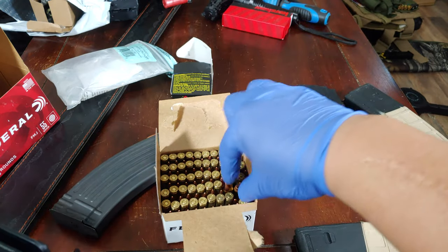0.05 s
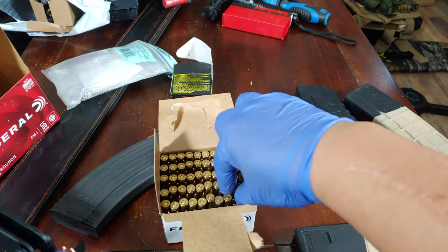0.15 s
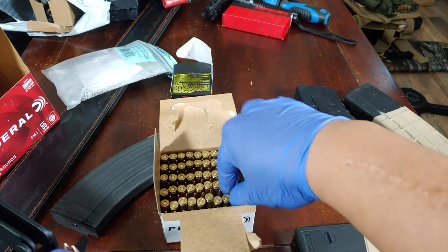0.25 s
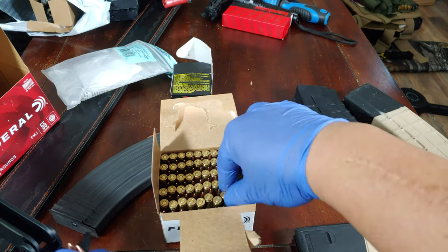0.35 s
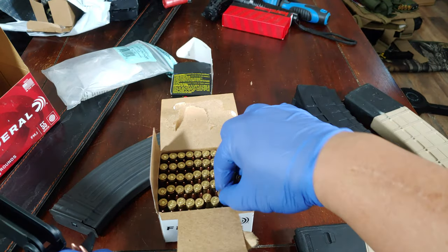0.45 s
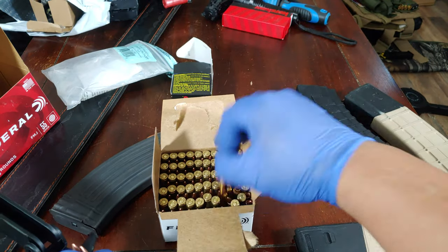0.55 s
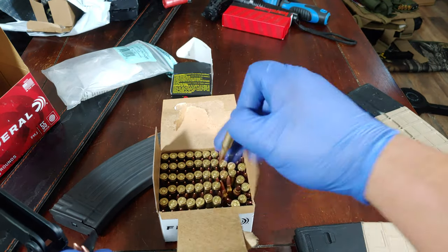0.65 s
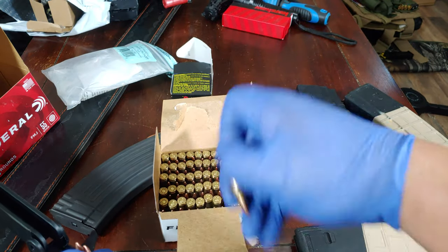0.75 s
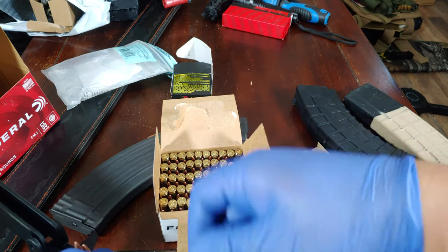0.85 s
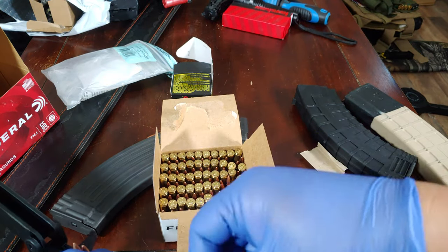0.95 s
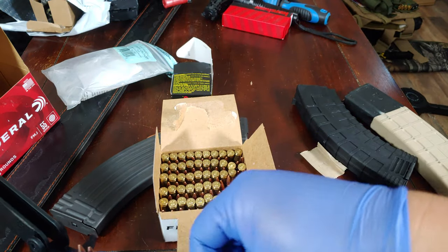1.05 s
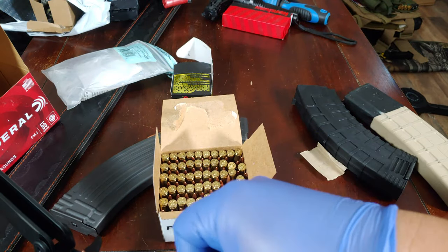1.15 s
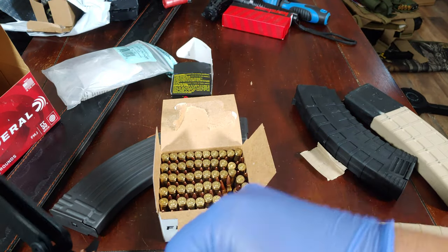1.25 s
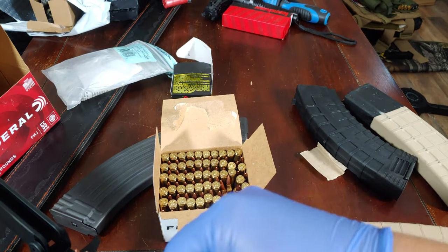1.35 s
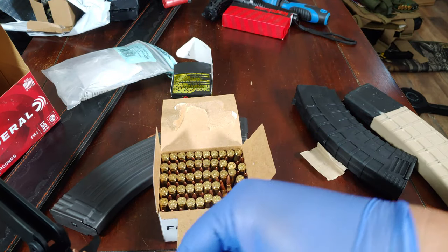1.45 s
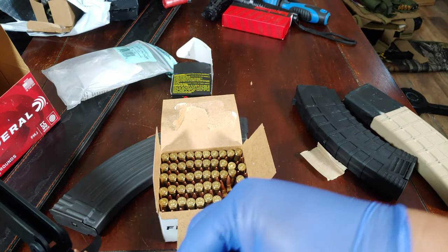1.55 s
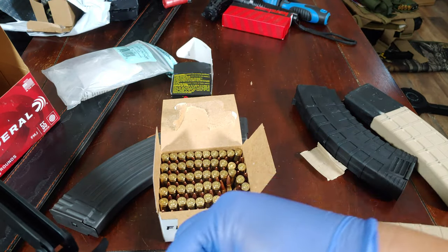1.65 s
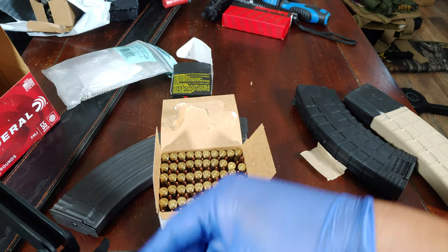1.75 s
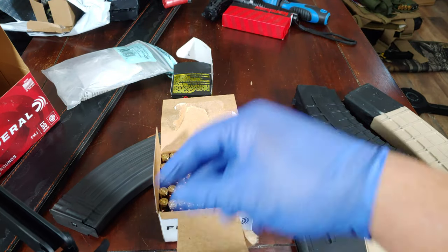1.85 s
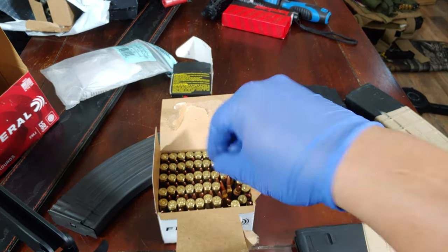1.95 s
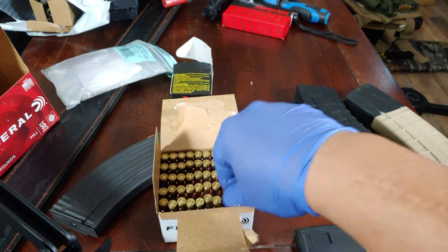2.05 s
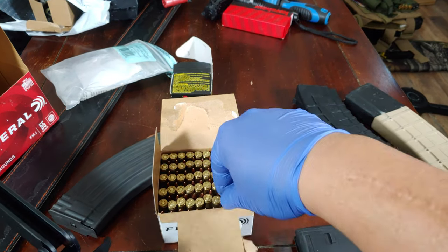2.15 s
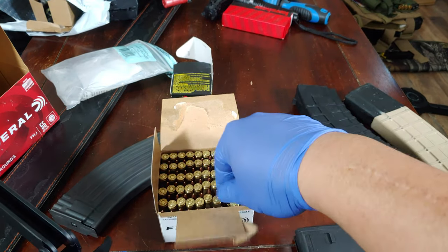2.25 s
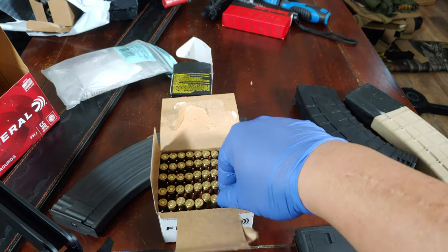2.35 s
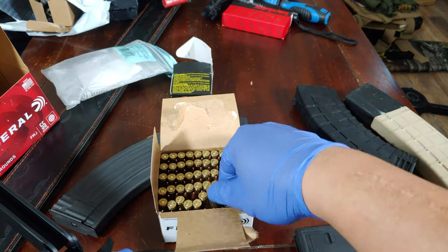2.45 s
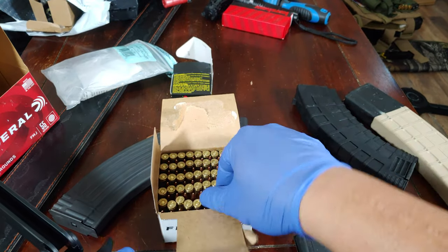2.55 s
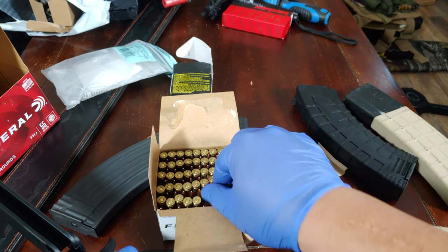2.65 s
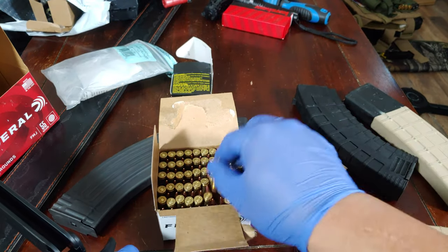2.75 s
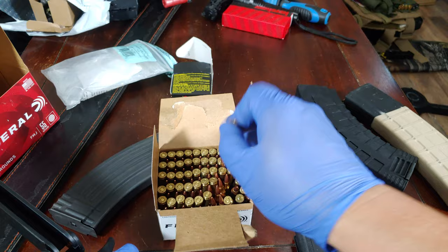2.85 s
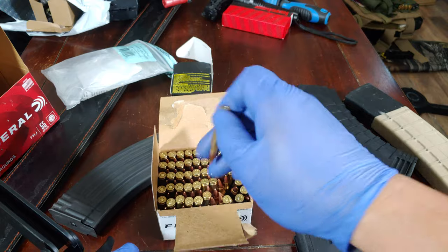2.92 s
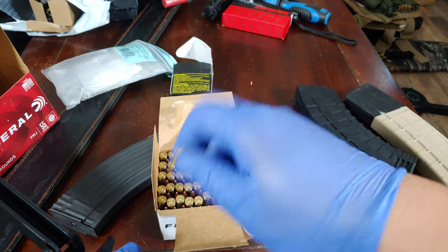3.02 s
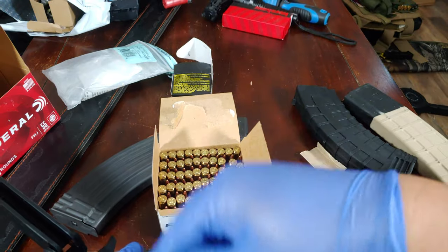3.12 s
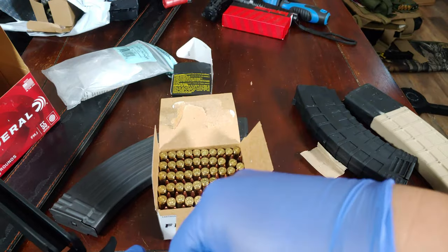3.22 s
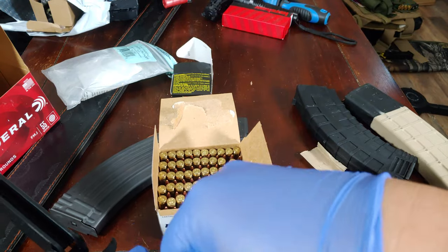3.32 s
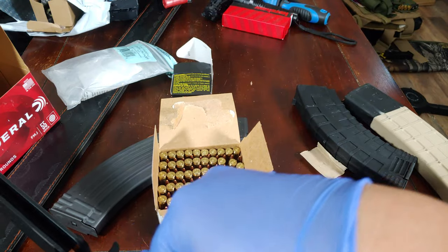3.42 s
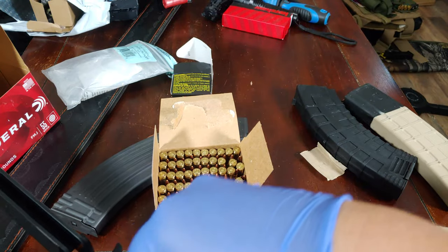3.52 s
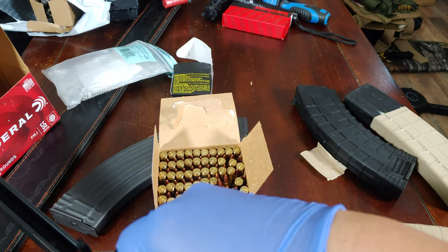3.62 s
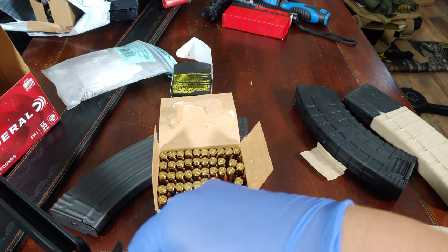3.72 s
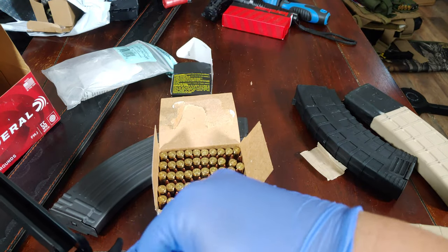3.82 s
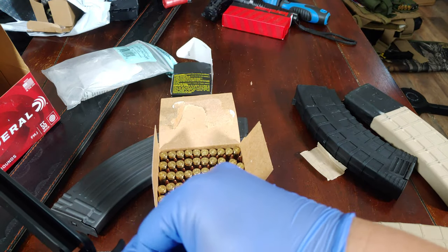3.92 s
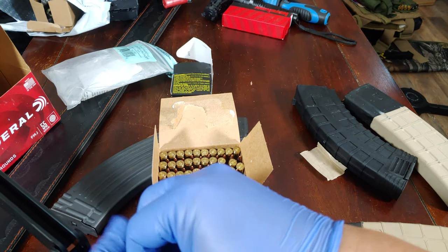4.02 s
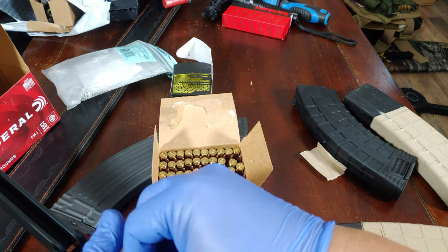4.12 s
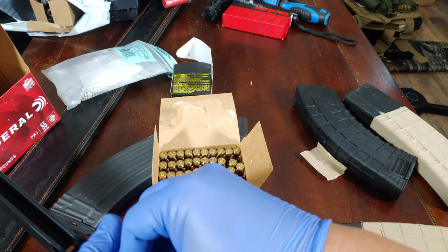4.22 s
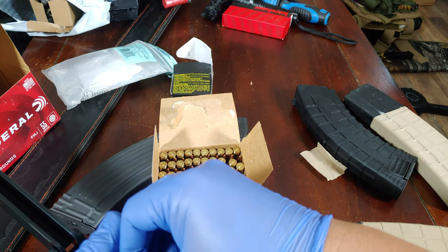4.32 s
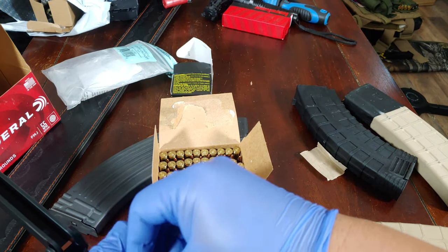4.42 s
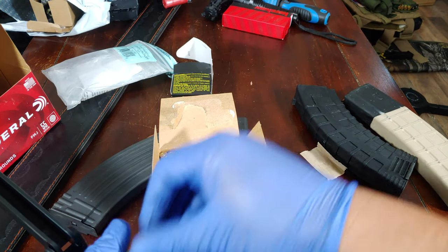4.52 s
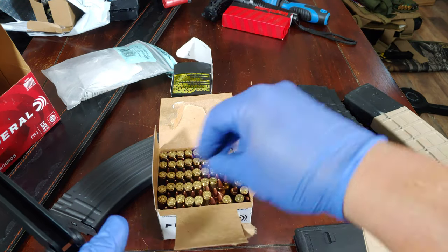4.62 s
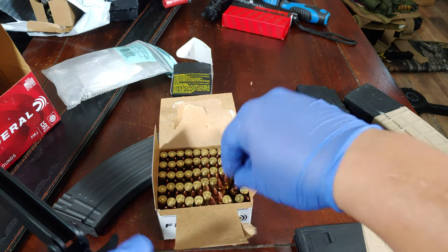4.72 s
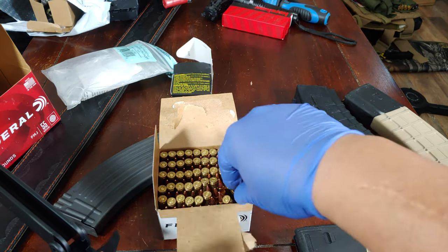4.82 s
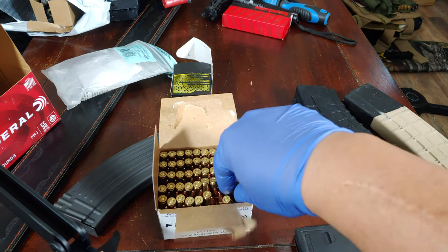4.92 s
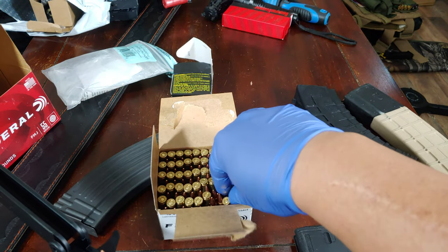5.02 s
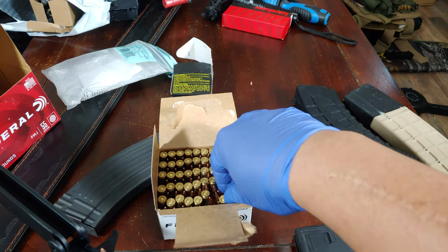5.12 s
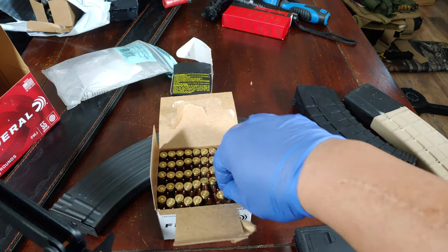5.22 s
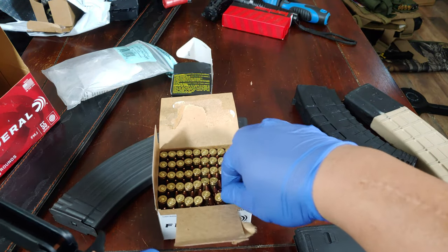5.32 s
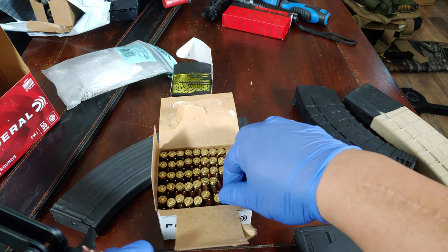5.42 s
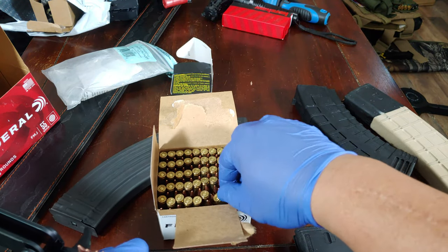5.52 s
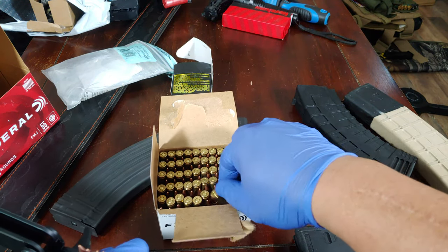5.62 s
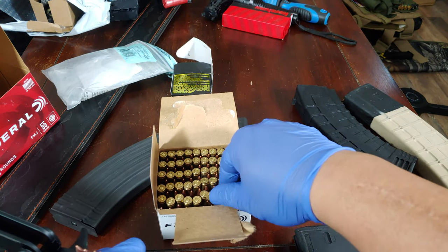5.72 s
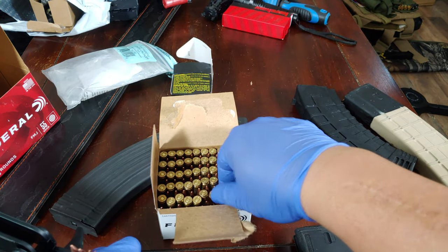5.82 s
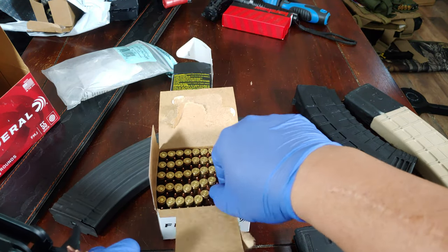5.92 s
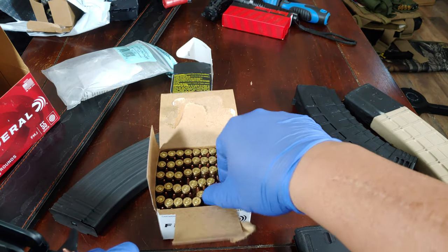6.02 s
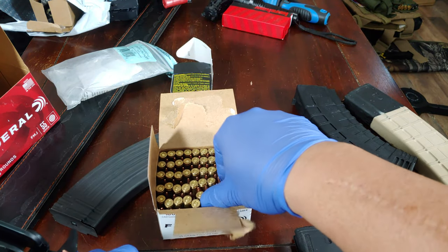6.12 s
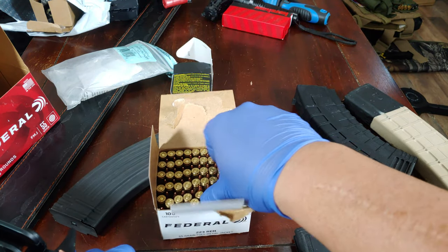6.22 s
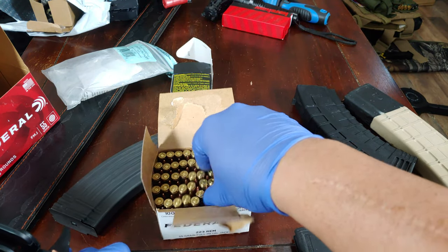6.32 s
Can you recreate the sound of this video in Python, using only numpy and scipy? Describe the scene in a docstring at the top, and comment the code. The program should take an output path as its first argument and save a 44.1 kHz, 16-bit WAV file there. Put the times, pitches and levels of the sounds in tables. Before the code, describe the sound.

Close, dry scraping and clinking of cartridges taken from a carton, then hard plastic snaps of a magazine, over a faint low room hum.

```python
"""Over a low hum of air, a gloved hand scrapes about in a cardboard box of brass cartridges.
Knocks on the box, clicks of a plastic magazine and clinks of brass follow; soft table bumps join in.
From about 1.4 s cases also slide along the feed lips; hits are loudest from 3 to 4.5 s, then busy again after 5 s.
Contacts are noisy pushes that ring modes, scrapes are clumped slips through resonances, hum is shaped noise.
Table echoes and a furnished room answer; two spaced microphone ports listen from close by."""
import sys
import numpy as np
from scipy import signal
from scipy.fft import rfft, irfft, next_fast_len
from scipy.io import wavfile
from scipy.ndimage import map_coordinates

SR = 44100
rng = np.random.default_rng(int(sys.argv[2]) if len(sys.argv) > 2 else 0)


def to_wav(s):
    """Save 16-bit WAV."""
    ch = np.atleast_2d(s).T  # columns
    pcm = np.round(np.clip(ch, -1, 1) * 32767)  # PCM
    wavfile.write(sys.argv[1], SR, pcm.astype(np.int16))


def invert_db(x):
    """Field ratio 10**(x/20) for x, a level in decibels (scalar or array-like)."""
    u = np.asarray(x, float) / 20
    return 10 ** u


N = 280917  # samples


def unit(x):
    """Scales a sound to rms 1."""
    return x / np.sqrt(np.mean(x ** 2) + 1e-20)


def along(points, hz):
    """Reads a curve of (Hz, value) points on a log frequency axis."""
    f, v = np.transpose(points)
    return np.interp(np.log(hz + 1), np.log(f + 1), v)


def filtered(x, response):
    """Multiplies the spectrum of x by a complex response of frequency."""
    m = next_fast_len(x.shape[-1] + 8192)
    spectrum = rfft(x, m) * response(np.fft.rfftfreq(m, 1 / SR))
    return irfft(spectrum, m)[..., :x.shape[-1]]


def pair(alike):
    """Two white noises whose likeness follows (Hz, 0-1) points, by mixing a mid and a side noise."""
    def weights(hz):
        turn = np.arccos(np.clip(along(alike, hz), 0, 1)) / 2
        return np.array([np.cos(turn), np.sin(turn)])
    mid, side = filtered(rng.standard_normal((2, N)), weights)
    return np.array([mid + side, mid - side])


def wander(step):
    """Smooth random curve with a new value every so many samples."""
    return map_coordinates(rng.standard_normal(N // step + 4), [np.arange(N) / step])


# Colour of the room tone. Each row: frequency in Hz, relative level in dB per Hz.
AIR_COLOUR = [(12, -49), (20, -26), (34, -8), (54, 1), (69, -10), (81, -10.5), (129, -7), (286, -19.5),
              (337, -16), (386, -15.5), (725, -27.5), (1250, -73.5), (14000, -46.5)]
# Likeness of the hum at the two ports. Each row: frequency in Hz, likeness from 0 to 1.
AIR_LIKENESS = [(60, 0.97), (240, 0.78), (950, 0.29), (3770, 0.21), (15000, 0.21)]
# Swells of the deepest bass. Each row: time in seconds, rms level in dB ahead of the microphone.
RUMBLE_LEVEL = [(0.0, -52.5), (0.3, -62.5), (0.92, -55.5), (1.06, -68), (1.38, -50.5), (2.07, -61),
                (2.29, -48.5), (2.38, -78), (2.48, -47), (2.62, -58.5), (3.03, -45), (3.37, -59.5),
                (4.7, -66), (5.06, -51), (5.23, -66), (5.46, -48.5), (5.91, -59), (6.01, -43), (6.17, -55),
                (6.37, -51)]


def air():
    """Shaped noise whose level wavers slowly; its deepest bass swells and sinks."""
    colour = lambda hz: invert_db(along(AIR_COLOUR, hz))
    low = filtered(pair(AIR_LIKENESS), lambda hz: colour(hz) / (1 + (hz / 150) ** 4))
    rumble = invert_db(np.interp(np.arange(N) / SR, *np.transpose(RUMBLE_LEVEL))) * unit(low)
    hum_db = -55.5 + 4.3 * wander(6000)
    return rumble + invert_db(hum_db) * unit(filtered(pair(AIR_LIKENESS), colour))


def rubbed(modes, level_db, rate, spread_db, widen, mono_hz):
    """Random small slips, coming in clumps, feed the resonances of a body."""
    slip_db = spread_db * np.minimum(rng.exponential(size=N), 3.5)
    slips = (rng.random(N) < rate / SR) * invert_db(slip_db)  # rate: slips per second
    decay = invert_db(-60 * np.arange(400) / SR / 0.0076)
    burst = signal.fftconvolve(slips, decay)[:N] * invert_db(2.09 * wander(800))
    drive = burst * pair([(mono_hz / 4, 1), (mono_hz, .6), (mono_hz * 4, .2)])

    def body(f):
        total = 0
        for k, (centre, db, t60) in enumerate(modes):
            damping = 1j * f * widen * np.log(1000) / np.pi / t60
            total = total + (-1) ** k * invert_db(db) * damping / (centre ** 2 - f * f + damping)
        return total
    return invert_db(level_db) * unit(filtered(drive, body))


def stirred(level_db, events, under_db, t60):
    """The fingers' level in dB, raised by a rattle that dies away after each contact."""
    kicks = np.zeros(N)
    for s, db, *_ in events:
        kicks[round(s * SR)] += invert_db(db - under_db) ** 2
    rattle = signal.lfilter([1], [1, -invert_db(-2 * 60 / t60 / SR)], kicks)  # a power
    return 10 * np.log10(invert_db(level_db) ** 2 + rattle)


# Fingers at work. Each row: time in seconds, then drive levels in dB, before the rattle of contacts is added,
# of the box scrape, the magazine rub and the brass jostle.
FINGERS = [(0.0, -60.5, -71, -69), (0.25, -53, -65.5, -75), (0.7, -49.5, -60, -70), (0.95, -58, -71.5, -65),
           (1.33, -56.5, -69, -69.5), (1.5, -54.5, -72.5, -69), (1.8, -55, -55, -65), (2.03, -63, -77, -86),
           (2.4, -56, -67.5, -76), (2.52, -44, -53.5, -49), (2.66, -50.5, -64, -58), (2.9, -38, -52.5, -62),
           (3.14, -52.5, -64.5, -59), (3.28, -64.5, -76, -67), (3.6, -53, -53.5, -85),
           (3.9, -55.5, -57, -69), (4.18, -58.5, -46, -43), (4.38, -60, -58, -73), (4.72, -71, -68.5, -85),
           (4.93, -63, -77.5, -75.5), (5.05, -54, -65, -70), (5.3, -48, -63, -63), (5.6, -53, -66.5, -74),
           (5.77, -54.5, -69.5, -76), (5.9, -43.5, -50.5, -58), (6.12, -39, -46, -61),
           (6.23, -51.5, -56.5, -71), (6.37, -43.5, -48, -59)]


def handling():
    """Fingers drag on the cardboard, rub the magazine and jostle the loose cases, all as clumped slips."""
    s, *levels = np.transpose(FINGERS)
    box_db, shell_db, brass_db = [np.interp(np.arange(N) / SR, s, db) for db in levels]
    # rattle: dB under the contact's listed strength, then t60 in seconds
    box_db = stirred(box_db, BOX_KNOCKS, 30, 0.25)
    shell_db = stirred(shell_db, SHELL_CLICKS, 33, 0.3)
    brass_db = stirred(brass_db, BRASS_CLINKS, 33.7, 0.3)
    scrape = rubbed(BOX_MODES, box_db, rate=500, spread_db=0.0, widen=1.0, mono_hz=1470)
    rub = rubbed(SHELL_MODES, shell_db, rate=560, spread_db=4.5, widen=1.1, mono_hz=900)
    jostle = rubbed(BRASS_MODES, brass_db, rate=400, spread_db=2.5, widen=3.8, mono_hz=1100)
    return scrape + rub + jostle


def ring(modes, centre_hz, blur_hz, slope_db, scatter_db, detune, mono_hz):
    """A body's modal answer to one tap at each port, and its answer averaged over all directions."""
    hz, db, t60 = np.transpose(modes)[:, :, None]
    t = np.arange(round(min(t60.max(), .2) * SR)) / SR
    pitch, common, differ, phase = rng.standard_normal((4, len(modes), 1))
    aim_db = -slope_db * np.abs(np.log2(hz / centre_hz))  # the spot struck favours the modes near one pitch
    apart = hz / (hz + mono_hz)  # short waves differ more from port to port
    swing = np.exp((2j * np.pi * hz * (1 + detune * pitch) - np.log(1000) / t60) * t)
    ports = []
    for side in (1, -1):
        strength = invert_db(db + aim_db + scatter_db * (common + side * apart * differ))
        ports.append(strength * np.exp(1.7j * side * apart * phase))
    tap = (np.array(ports)[:, :, 0] @ swing).imag

    # over all directions the powers of the modes add and smear
    f = np.fft.rfftfreq(8192, 1 / SR)
    width = np.log(1000) / (2 * np.pi * t60)
    wide = width + blur_hz
    peaks = invert_db(db + aim_db) ** 2 * wide / width / ((f - hz) ** 2 + wide ** 2)
    power = np.sum(peaks, axis=0) * f ** 2 / (f ** 2 + hz.min() ** 2)
    # folding the cepstrum gives this spectrum its earliest, minimum-phase answer
    cepstrum = irfft(np.log(power + 1e-12))[:4096]
    cepstrum[0] /= 2
    spread = irfft(np.exp(rfft(cepstrum, 8192)))[:4096]
    return tap, spread


# The crack at the moment of contact, for every kind of hit. Each row: frequency in Hz, relative level in dB per Hz.
CRACK_COLOUR = [(180, -46.5), (300, -21), (4170, 0), (5640, -7.5), (8020, 6), (9490, -9), (10300, -3.5),
                (13300, -27), (16500, -26.5)]


def blows(events, modes, gain_db, crack_db, sharp, blur_hz, **body):
    """Each contact is a rough push that swells and fades, ringing the body and cracking: left, right, all round."""
    rings, cracks = np.zeros((2, 3, N + SR))
    for s, db, centre_hz, pan_db, rise_ms in events:
        t = np.arange(round(rise_ms * SR / 100) + 8) / SR  # ten rise times
        u = t / (rise_ms / 1000)
        push = u * np.exp(1 - u) * rng.standard_normal((3, len(t)))
        grit = np.repeat(rng.standard_normal(len(t) // 64 + 1), 64)[:len(t)]
        push = push * invert_db(4.5 * grit)  # it catches and slips
        push[:, np.argmax(u >= 1)] += sharp  # the moment of hardest contact
        tap, spread = ring(modes, centre_hz, blur_hz, **body)

        sound = signal.fftconvolve(tap[:2], push[:1], axes=1)
        sound = sound / np.sqrt(np.mean(np.max(sound ** 2, axis=1)))
        level = invert_db(db + np.array([[pan_db / 2], [-pan_db / 2]]))
        at = round(s * SR)
        rings[:2, at:at + sound.shape[1]] += level * sound

        # a short push is one tap to the room
        around = signal.fftconvolve(spread, push[2]) if rise_ms > 4 else spread
        match = np.linalg.norm(sound) / np.linalg.norm(around) / np.sqrt(2)
        rings[2, at:at + len(around)] += invert_db(db) * around * match
        crack = 0.17 * push[:1] + 0.39 * push  # partly shared by the three rows
        cracks[:, at:at + len(t)] += np.append(level, invert_db(db))[:, None] * crack
    snap = filtered(cracks, lambda hz: invert_db(along(CRACK_COLOUR, hz)))
    return (invert_db(gain_db) * rings + invert_db(crack_db) * snap)[:, :N]


def radiated(x, low_hz):
    """Small things radiate little bass: a second-order roll-off below low_hz."""
    return filtered(x, lambda hz: (1j * hz / (low_hz + 1j * hz)) ** 2)


# Knocks that ring the cardboard box; the rows at 4.0223 s and 4.1355 s are the two hard snaps, here given a low
# cardboard ring. # Each row: start in seconds, relative strength in dB, favoured pitch in Hz, rise in ms.
BOX_KNOCKS = [(0.023, -34.5, 1020, 6.9), (0.1452, -29.5, 740, 1.85), (0.295, -33.5, 1000, 5.5),
              (0.409, -28.5, 980, 5.8), (0.44, -29, 1060, 3.6), (0.535, -34.5, 1000, 3),
              (0.642, -26, 960, 4.4), (0.8058, -23.5, 770, 1.63), (0.83, -37.5, 900, 3),
              (1.0854, -29.5, 1060, 1.2), (1.2004, -31.5, 537, 2.1), (1.4686, -30, 825, 1.42),
              (1.7673, -31, 750, 1.5), (1.8698, -22.5, 1100, 0.45), (2.462, -28.5, 900, 4),
              (2.5396, -32, 1050, 5), (2.674, -23, 1000, 2), (2.9329, -19.5, 704, 3.46),
              (2.9593, -22, 415, 1.7), (3.0242, -8, 660, 0.86), (3.0295, -15.5, 600, 0.49),
              (3.05, -24, 490, 2.8), (3.3496, -19.5, 960, 2.7), (3.5857, -24.5, 840, 1.15),
              (3.602, -25, 1030, 3.5), (3.6654, -26, 1190, 2.14), (3.9882, -22, 1180, 1.5),
              (4.0223, -24.5, 770, 0.71), (4.1355, -23, 830, 0.71), (4.1689, -29, 367, 10.84),
              (4.2379, -26, 1100, 8.5), (5.0207, -30.5, 840, 2.2), (5.061, -34.5, 690, 2.8),
              (5.3375, -34, 1040, 10), (5.365, -30.5, 806, 3.6), (5.4586, -34.5, 945, 6.2),
              (5.4743, -20.5, 1120, 2.6), (5.6502, -22.5, 1150, 0.63), (5.696, -34, 1190, 3),
              (5.8283, -21.5, 1000, 2), (5.8872, -28.5, 704, 5.1), (5.9022, -24, 970, 3.7),
              (5.9844, -18, 1080, 1.2), (6.0199, -24, 1030, 5.6), (6.0726, -23, 960, 5.9),
              (6.1159, -30.5, 1000, 7.5), (6.1498, -21, 1080, 3.3), (6.287, -24.5, 1000, 0.9),
              (6.295, -23, 1000, 2.44), (6.3217, -25.5, 854, 4.1)]
# Resonances of the box. Each row: frequency in Hz, relative level in dB, t60 in seconds.
BOX_MODES = [(234, -1, 0.04), (339, -1.5, 0.021), (503, -2, 0.021), (600, -3, 0.025), (750, -2, 0.035),
             (957, 3, 0.023), (1135, -1.5, 0.031), (1239, 1.5, 0.02), (1585, -2, 0.016), (1950, -6, 0.013),
             (2410, -20.5, 0.0064)]


def knocks():
    """Cases knock the box and ring its short, low cardboard modes."""
    pan_db = -0.5  # left over right
    events = [(s, db, hz, pan_db, rise_ms) for s, db, hz, rise_ms in BOX_KNOCKS]
    card = dict(slope_db=5, scatter_db=2, detune=.06, mono_hz=3000)
    return radiated(blows(events, BOX_MODES, 0.36, -53.5, 4.4, 30, **card), 170)


# Contacts with the magazine shell.
# Each row: start in seconds, relative strength in dB, favoured pitch in Hz, left over right in dB, rise in ms.
SHELL_CLICKS = [(0.1546, -35.5, 2800, -3, 0.6), (0.1934, -29.5, 2510, -1, 0.34),
                (0.695, -38, 2180, -6, 0.23), (1.0644, -32, 1950, 0, .98), (1.0855, -10, 3750, 9, 0.44),
                (1.2499, -32.5, 2360, 4, 0.79), (1.3273, -44, 2320, 7, 1), (1.4278, -26, 3300, 4, 0.49),
                (1.484, -35, 3540, -3, 0.34), (1.6029, -37.5, 2590, 11, 1.8), (1.7305, -35.5, 2760, 3, 5.2),
                (1.8414, -33.5, 3000, 14, .44), (1.811, -30.5, 3600, 0, 1), (1.8695, -17.5, 3300, 17, 0.4),
                (1.8709, -20, 2580, -16, 2.7), (1.949, -22, 3280, 0, 0.32), (2.2204, -44, 1960, -1, 2.3),
                (2.575, -28.5, 2550, 6, 0.68), (2.9325, -28.5, 3020, 6, 1.15),
                (3.3489, -21.5, 2580, 1, 0.65), (3.392, -12.5, 2287, 3, 0.828),
                (3.583, -27.5, 2200, 6, 0.32), (3.6679, -20.5, 2530, 5, 2.3), (3.6961, -8, 2734, 3, 1.67),
                (3.7183, -17, 3200, 6.5, 2.72), (3.9177, -30, 2240, -2, 0.8), (3.966, -31, 2110, 2, 3.1),
                (3.988, -4.5, 3000, 2, 1.44), (4.0214, -14.5, 3060, 10.5, 0.53),
                (4.1365, -9.5, 3470, 5.5, 0.39), (4.2457, -23, 2720, 11, 1.6),
                (4.2526, -15.5, 3300, 11.5, .43), (4.4388, -11, 3580, -4, 1.05),
                (4.449, -8, 3493, 13, 0.33), (4.959, -49, 1720, 10, 0.26), (5.1023, -39.5, 2490, 8, 0.85),
                (5.98, -33, 2380, 1, 1.1), (6.297, -31, 2410, 3, 3.4)]
# Resonances of the plastic shell. Each row: frequency in Hz, relative level in dB, t60 in seconds.
SHELL_MODES = [(1120, -46.5, 0.007), (1578, 0.5, 0.031), (1804, -10, 0.017), (2104, -1.5, 0.016),
               (2448, -2.5, 0.021), (2800, -0.5, 0.0099), (3307, -0.5, 0.011), (3550, -1, 0.011),
               (3913, -3.5, 0.011), (3790, -3.5, 0.018), (4240, -3, 0.013), (4383, -2.5, 0.0062),
               (5000, -8, 0.0025), (5980, -9, 0.015), (6575, -9, 0.021), (8300, -15, 0.008)]


def clicks():
    """Cases click against the magazine and ring the modes of its shell."""
    shell = dict(slope_db=5, scatter_db=1.5, detune=.03, mono_hz=1500)
    return radiated(blows(SHELL_CLICKS, SHELL_MODES, 2.05, -24.5, 8.1, 77, **shell), 680)


# Brass on brass. Each row: start in seconds, relative strength in dB, left over right in dB.
BRASS_CLINKS = [(0.1552, -35, -3), (0.1924, -35, -14), (0.29, -42, 4), (0.347, -44, -5),
                (0.3877, -36.5, -7), (0.4033, -27.5, -1), (0.42, -24.5, -4), (0.445, -26, -7),
                (0.535, -39.5, 0), (0.5646, -35.5, 1.5), (0.5748, -34, -7), (0.595, -30, 2),
                (0.645, -35, -11), (0.694, -39, 0), (0.793, -44, 0.5), (2.3667, -40.5, -5), (2.451, -44, 5),
                (2.4707, -29.5, 0), (2.5391, -29.5, -10), (2.5633, -36, 4), (2.5748, -24.5, -17),
                (2.6965, -26, -8.5), (2.7849, -35.5, 3), (2.8185, -23.5, 9), (2.8464, -17.5, 2),
                (2.871, -24, 6), (2.92, -27.5, -17), (2.933, -17, 18), (2.947, -17, -5), (3.038, -22.5, 4),
                (3.071, -21.5, -2), (3.6964, -11, 2), (4.0221, -5.5, -2), (4.048, -15, -3),
                (4.1347, -6, -1.5), (4.146, -24, -4), (4.2407, -20.5, -11), (5.1536, -36.5, -1),
                (5.2543, -35.5, 4), (5.4695, -32, -8), (5.6213, -38.5, -1), (5.6442, -33, 4),
                (5.6623, -25.5, -1), (5.8195, -29, -1), (5.827, -17.5, -1.5), (5.907, -37.5, -15),
                (5.9822, -20, -3), (6.0047, -19, -10), (6.072, -23.5, -2), (6.088, -28, -16),
                (6.1197, -23.5, 1), (6.149, -18, 1), (6.2587, -32.5, -7.5), (6.2976, -21.5, -17),
                (6.333, -26, -15)]
# Resonances of the cases. Each row: frequency in Hz, relative level in dB, t60 in seconds.
BRASS_MODES = [(6474, -8.5, 0.05), (7080, -9.5, 0.023), (7800, -20.5, 0.36), (8340, -27.5, 0.21),
               (8080, -21.5, 0.58), (7870, 4.5, 0.009), (8200, 8, 0.0052), (8535, 4, 0.0069),
               (9850, -24.5, 0.013), (10200, -17.5, 0.0056), (11530, -18, 0.038), (14270, -18.5, 0.041),
               (15500, -3, 0.12)]


def clinks():
    """Cases clink together and ring high brass modes; hard clinks favour lower ones."""
    events = []
    for s, db, pan_db in BRASS_CLINKS:
        centre_hz = 8100 - 38.5 * max(db + 24, 0)  # sags 38.5 Hz per dB above -24 dB
        events.append((s, db, centre_hz, pan_db, 0.8))  # rise in ms
    case = dict(slope_db=22, scatter_db=2, detune=.005, mono_hz=2000)
    return radiated(blows(events, BRASS_MODES, -1.6, -14.5, 3.0, 2.5, **case), 820)


# Table bumps. Each row: start in seconds, strength in dB before the soft onset, pitch in Hz.
TABLE_BUMPS = [(0.555, -42, 137), (0.64, -38.5, 250), (1.195, -37.5, 103), (1.473, -34.5, 132),
               (1.813, -34.5, 119), (1.932, -40, 127.5), (1.988, -40.5, 119), (2.461, -34, 74),
               (2.867, -33.5, 112), (2.948, -22, 223), (3.017, -19, 274), (3.585, -31, 116),
               (3.831, -36, 191), (4.162, -28, 191), (4.286, -41, 159), (5.259, -43, 126),
               (5.368, -30.5, 210.7), (5.865, -36.5, 162), (6.011, -24.5, 160)]


def thumps():
    """Hands and magazine bump the table top: a soft, low, decaying sine, alike at both ports."""
    out, t = np.zeros(N + SR), np.arange(SR // 8) / SR
    for s, db, hz in TABLE_BUMPS:
        envelope = invert_db(db - 60 * t / 0.058) * (1 - np.exp(-t / 0.00099))
        out[round(s * SR):][:len(t)] += np.sin(2 * np.pi * hz * t) * envelope
    return out[:N]


# Cases dragged along the feed lips.
# Each row: start in seconds, relative strength in dB, favoured pitch in Hz, rise in ms.
LIP_SLIDES = [(1.385, -32.5, 3300, 20), (1.439, -37.5, 2470, 19), (1.575, -40.5, 2580, 12.4),
              (1.726, -29, 2970, 9.5), (1.768, -34.5, 2510, 4.6), (4.226, -26.5, 2986, 11),
              (4.965, -48.5, 4570, 9.4)]


def slides():
    """Cases slide into the magazine: slow, gritty pushes ring the shell."""
    events = [(s, db, hz, 0, rise_ms) for s, db, hz, rise_ms in LIP_SLIDES]
    shell = dict(slope_db=5, scatter_db=1.5, detune=.03, mono_hz=1500)
    return radiated(blows(events, SHELL_MODES, 0.57, -11.5, 0.38, 70, **shell), 680)


def later(x, delays):
    """Delays each channel by its own number of samples."""
    return np.array([np.pad(row, (delay, 0))[:N] for row, delay in zip(x, delays)])


# Echoes off the table. Each row: left delay in samples, right delay in samples, level in dB.
TABLE_ECHOES = [(71, 104, -10), (152, 127, -12), (263, 318, -13), (410, 372, -14)]


def table(near):
    """Quick echoes off the table top and its clutter: delayed, softer copies."""
    return sum(invert_db(db) * later(near, (left, right)) for left, right, db in TABLE_ECHOES)


# Decay of the room. Each row: frequency in Hz, t60 in seconds.
ROOM_DECAY = [(200, 0.74), (600, 0.5), (1500, 0.36), (4000, 0.42), (10000, 0.38), (16000, 0.23)]


def room(x):
    """Noise tails in which each frequency dies at its own speed, redrawn every quarter second."""
    out, step = np.zeros((2, N + 2 * SR)), SR // 4
    for at in range(0, N, step):
        hz, t, z = signal.stft(rng.standard_normal((2, SR * 3 // 5)), SR, nperseg=256)
        turn = np.pi / 4 * np.clip(hz / 1500, 0, 1)[:, None]  # long waves are alike at both ports
        z = np.cos(turn) * z[0] + np.array([1, -1])[:, None, None] * np.sin(turn) * z[1]
        decay = invert_db(-60 * t / along(ROOM_DECAY, hz)[:, None])
        tail = signal.istft(z * decay, SR, nperseg=256)[1]
        wet = signal.fftconvolve(x[None, at:at + step], tail / np.linalg.norm(tail[0]), axes=1)
        out[:, at + 200:at + 200 + wet.shape[1]] += wet  # 200 samples of pre-delay
    return out[:, :N]


def scene():
    """Near sounds, quick echoes off the table, the room and its tone."""
    hits = knocks() + clicks() + clinks() + slides()
    steady = handling() + thumps()
    near = hits[:2] + steady
    direct = later(near, (0, 7))  # samples: the hands are nearer the left port
    reverb = invert_db(-5.5) * room(hits[2] + steady.mean(0))
    return direct + table(near) + reverb + air()


def low_pass(x):
    """Removes everything above the highest recorded frequency."""
    return signal.sosfilt(signal.butter(12, 16830, fs=SR, output="sos"), x)


# Response shared by the ports. Each row: frequency in Hz, level in dB.
MICROPHONE_RESPONSE = [(11000, 2), (12500, -7.5), (14000, -19), (16500, -16.5)]
# Mismatch of the ports. Each row: frequency in Hz, left over right in dB.
PORT_MISMATCH = [(60, 1.5), (150, 0), (380, 1.5), (950, -1.5), (2380, 2.5), (5980, -0.5), (15000, 1)]


def record(dry):
    """The ports fade in the top octave and differ a little; the converter tops out at full scale."""
    halves = np.array([[.5], [-.5]])
    response_db = lambda hz: along(MICROPHONE_RESPONSE, hz) + halves * along(PORT_MISMATCH, hz)
    heard = filtered(dry, lambda hz: invert_db(response_db(hz)))
    return low_pass(np.clip(heard, -1, 1))


dry = scene()
out = record(dry)
to_wav(out)
```